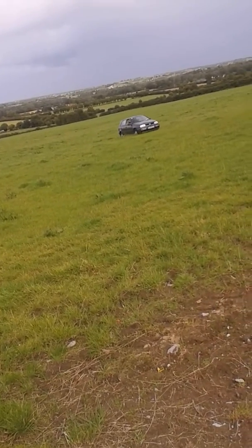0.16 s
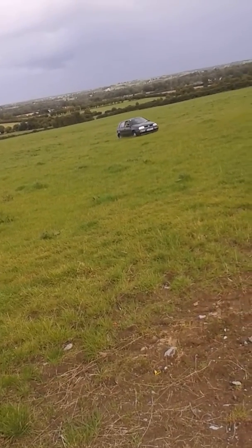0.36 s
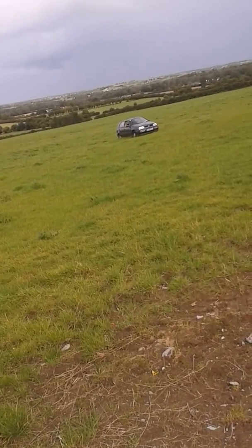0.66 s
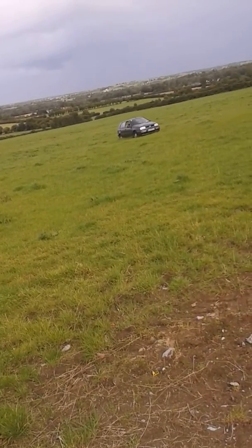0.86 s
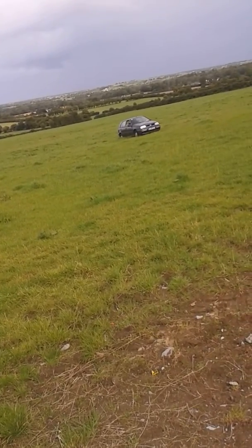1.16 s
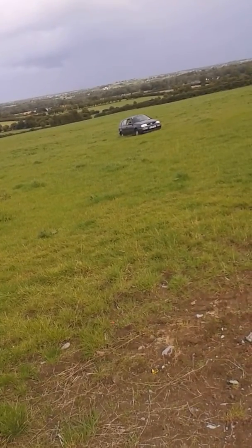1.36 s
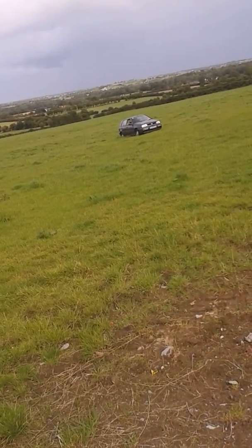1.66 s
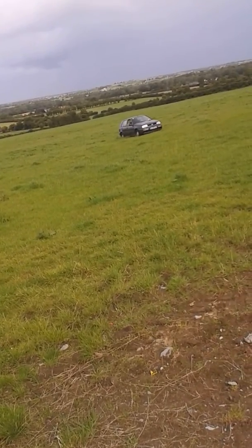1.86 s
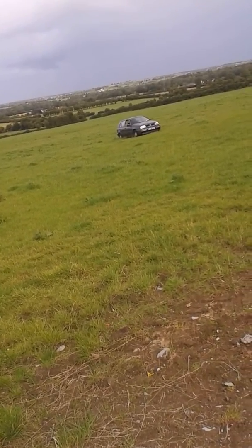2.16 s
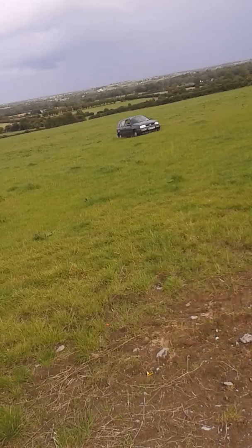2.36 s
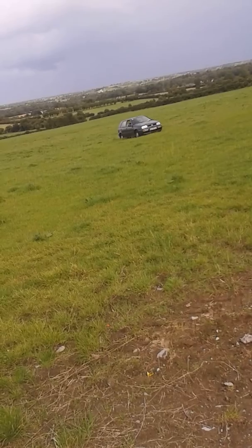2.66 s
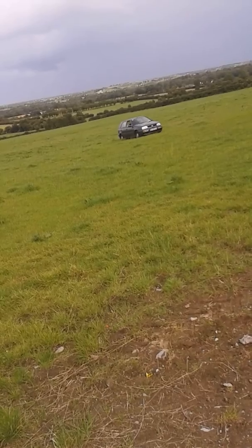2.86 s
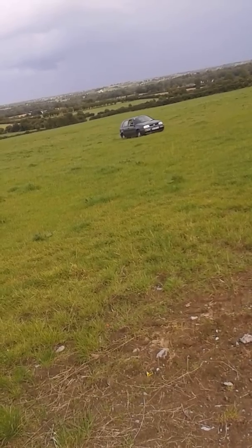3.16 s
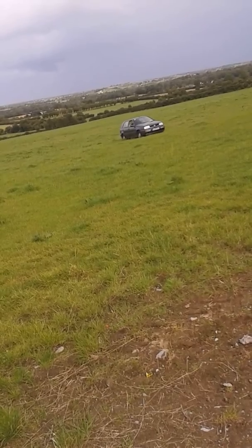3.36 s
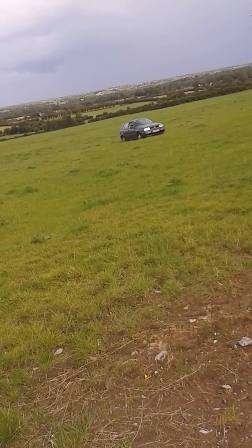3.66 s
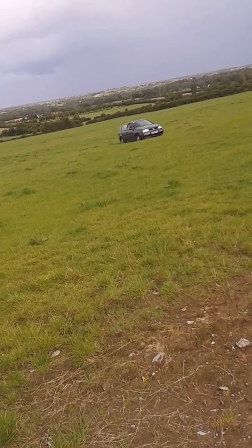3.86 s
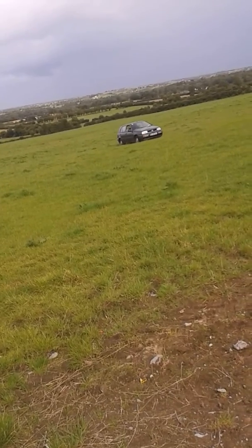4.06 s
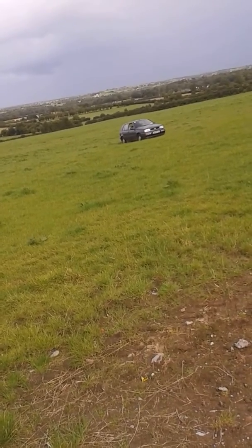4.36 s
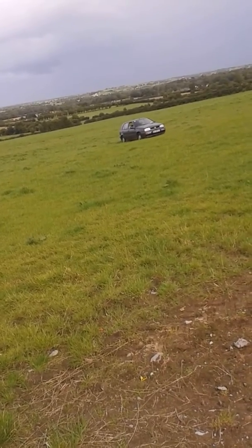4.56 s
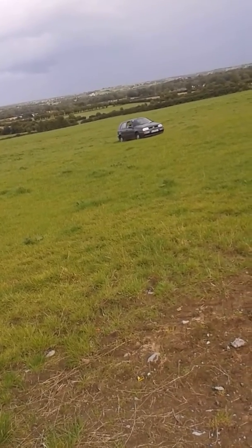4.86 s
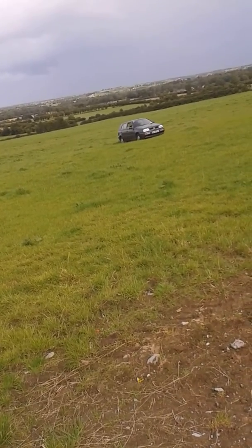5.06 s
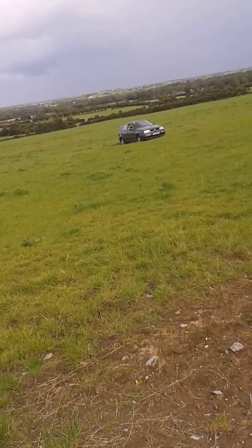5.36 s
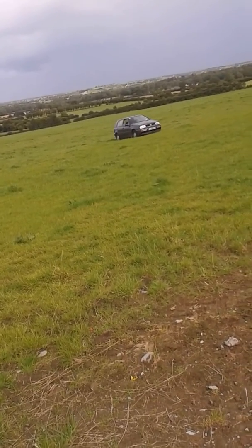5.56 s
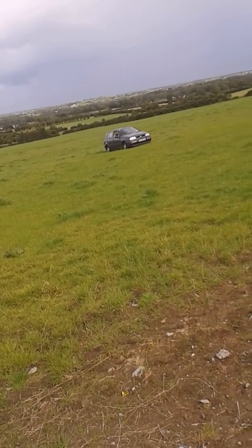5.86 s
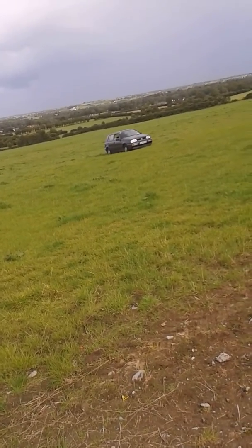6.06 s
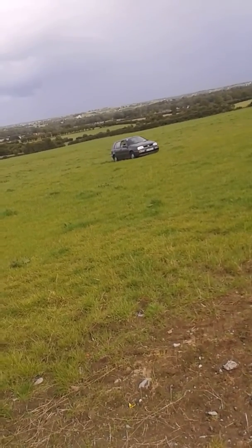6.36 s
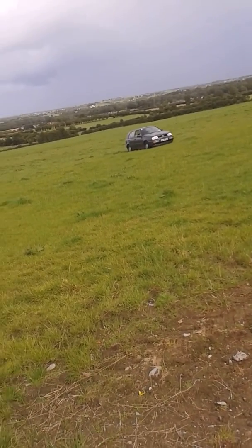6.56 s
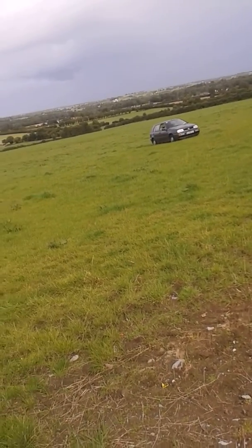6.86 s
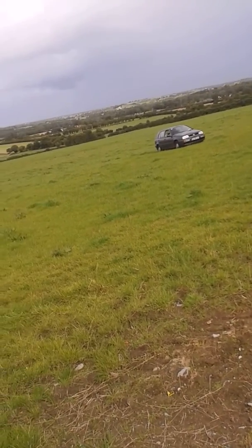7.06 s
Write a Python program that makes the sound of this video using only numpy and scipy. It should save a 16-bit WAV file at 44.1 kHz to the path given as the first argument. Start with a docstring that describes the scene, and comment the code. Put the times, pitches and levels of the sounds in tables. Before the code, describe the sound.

Over faint, low field air, a small car engine chugs unevenly and gathers speed while sharp metal clanks sound through the first two seconds. Two quick revs follow, the exhaust sputtering as each falls away. The engine then holds a fairly steady drone with hiss and rattling sheet metal. A single dry tick comes before a final rev. The microphone is some distance from the car, outdoors.

```python
"""A grass field, with faint air underneath. Some way off a small four-cylinder car labours across it,
pulling away from a slow idle and blipped three times. Each firing sends a pressure pulse through the
resonances of the exhaust pipe and a puff of gas hiss through rattling sheet metal; off the throttle
the firings turn uneven. Hard clanks mark the first two seconds, and one dry tick comes later."""
import sys
import numpy as np
from scipy import signal
from scipy.io import wavfile
from scipy.ndimage import uniform_filter1d

SR = 44100
rng = np.random.default_rng(int(sys.argv[2]) if len(sys.argv) > 2 else 0)


def unload_audio(sound):
    """Save the sound as a 16-bit wav file, at the path given as the first command line argument."""
    columns = np.transpose(np.atleast_2d(sound))
    # keep every value between -1 and 1, then stretch to whole-number steps
    steps = np.round(np.clip(columns, -1, 1) * 32767)
    wavfile.write(sys.argv[1], SR, steps.astype(np.int16))


N = 318402

# Field air. Each row: frequency in Hz, relative spectral density in dB.
AIR_SPECTRUM = [(30, -22), (60, 3.5), (200, 1.5), (800, -13), (3500, -26.5), (15600, -37)]
# Engine speed. Each row: time in seconds, firings per second.
FIRING_RATE = [(0.0, 17.0), (0.417, 14.9), (0.704, 36.1), (0.919, 37.4), (1.19, 31.4), (1.4, 32.8),
               (1.809, 46.3), (2.147, 73.3), (2.325, 72.6), (2.6, 87.8), (2.79, 104.0), (2.93, 90.5),
               (3.118, 68.7), (3.506, 103.3), (3.825, 68.0), (4.212, 64.7), (4.525, 70.6), (4.856, 66.7),
               (5.539, 73.0), (5.9, 67.0), (6.229, 82.3), (6.731, 80.0), (6.997, 98.0), (7.22, 93.2)]
# Throttle opening. Each row: time in seconds, gas hiss level in dB before surges.
THROTTLE = [(0.0, -50), (0.34, -53.5), (0.67, -42.5), (1.08, -44.5), (1.27, -38.5), (1.76, -40),
            (2.09, -34), (2.3, -42), (2.47, -38.5), (2.62, -42), (2.78, -40), (2.88, -48.5), (3.13, -46.5),
            (3.22, -35.5), (3.52, -37.0), (3.57, -48), (4.21, -44), (4.43, -38.5), (4.71, -46.5),
            (5.03, -41), (5.54, -42.5), (5.6, -47), (5.88, -45.5), (6.0, -36), (6.12, -36), (6.28, -43),
            (6.65, -43.5), (6.75, -33.5), (6.97, -36.5), (7.22, -44)]
# Open throttle meets the main pipe resonance. Each entry: peak time in seconds.
SURGE_TIMES = [2.71, 3.42, 6.93]
# The throttle shuts. Each row: start and end in seconds, unevenness from 0 to 1.
LIFTS = [(2.28, 2.33, .7), (2.81, 3.11, .88), (3.54, 3.88, .85)]
# Rough running. Each row: firings per second, unevenness from 0 to 1.
UNEVEN_BY_SPEED = [(15, .38), (33, .26), (37, .13), (62, .03)]
# The tailpipe side swings into view. Each row: time in seconds, turn from 0 to 1.
TURN = [(0, 0.67), (1.5, 0.25), (2.5, 0.01), (3.5, 0.02), (4, 0), (5, 0.08), (5.7, 0.77), (6.0, 0.98),
        (6.5, 0.99), (6.9, 0.99), (7.22, 0.75)]
# The four cylinders. Each row: strength in dB, delay in milliseconds.
CYLINDERS = [(-0.5, 0.036), (-0.5, 0.15), (0.45, 0.087), (-1, 0.14)]
# Pipe turbulence clears as the gas flows faster. Each row: firings per second, relative level in dB.
SWIRL_BY_SPEED = [(67, 3), (85, -5)]
# Exhaust modes in four groups. Each row: frequency in Hz, bandwidth in Hz, relative gain in dB.
BOOM_MODES = [(70, 5.6, 10.5), (90.7, 19, 7), (130, 75, -2.5)]
NOTE_MODES = [(183.4, 10.7, -0.055), (214.1, 8.4, -0.89), (241.1, 6.6, -0.75)]
BARK_MODES = [(290.4, 29.8, 2), (332.3, 34.4, -0.5), (369, 27, 0.5), (434, 26.5, -4), (466.5, 22, -7.5)]
GROWL_MODES = [(559, 43, 1.5), (697, 55, 4)]
# Exhaust loudness. Each row: firings per second, then base levels of note, boom and bark in dB.
PIPE_LEVELS = [(15.2, -57.5, -51, -74), (31.2, -38, -37.5, -52.5), (36.3, -36.5, -38.5, -46.5),
               (47, -34, -35.0, -47.5), (55.0, -40, -42, -40.5), (61.5, -33, -33.5, -45.0),
               (67.7, -36, -36.0, -49), (70.65, -28.0, -37.0, -44.5), (76.2, -28, -40.5, -37.5),
               (80.8, -25.5, -41.5, -43), (85.4, -28.0, -34.0, -38.5), (97.5, -24.5, -33.5, -33.5),
               (102, -25.5, -33.5, -32.5)]
# Response of note, boom and bark. Each row: dB per dB of throttle, dB per unit of surge.
PIPE_RESPONSE = [(.12, 11), (0.48, 10.5), (0.31, 4.5)]
# Escaping gas. Each row: frequency in Hz, relative spectral density in dB.
HISS_SPECTRUM = [(300, -30), (500, -20), (800, -4), (1500, -9), (2500, -1), (4000, -3.5), (6200, -21.5),
                 (7000, -15), (12000, -20.5), (15600, -29)]
# Sheet metal and tailpipe. Each row: frequency in Hz, nominal bandwidth in Hz, relative gain in dB,
# nominal dB gained per dB of hiss, dB gained at full turn.
METAL_MODES = [(1079, 213, -2.5, -1.5, -10), (1248, 180, -10.5, 0.5, 0), (1899, 320, -2, -4.8, -3.5),
               (2530, 260, 1.5, 0.26, 4.5), (2762, 190, 2.5, 9.5, -9), (3532, 150, -3.5, -0.5, 1.5),
               (3970, 660, -2.5, 1, 0), (5086, 290, -3, 0.5, 0.5), (6030, 520, -3, 0, -2.5),
               (6940, 550, -13.5, 0, 0.5), (8150, 510, -17.5, 1, 3.5), (8980, 560, -19, 0.5, 5.5),
               (10350, 770, -19, 0.5, 3), (11440, 580, -22, 0, 1), (12700, 800, -27.5, 1, -1)]
# Hard firings under load. Each row: start in seconds, relative peak in dB, ring frequency in Hz.
CLANKS = [(0.109, -33, 2880), (0.488, -31, 3550), (0.5334, -30, 3480), (0.611, -28, 2900),
          (0.646, -37, 2000), (0.6714, -30, 3640), (0.761, -27, 2720), (0.787, -24, 3700),
          (0.8944, -28, 3670), (1.0347, -27, 2080), (1.09, -26, 3840), (1.1162, -24, 2420),
          (1.1525, -26, 4200), (1.2164, -24, 5940), (1.241, -20.5, 2640), (1.3393, -29, 3400),
          (1.4324, -25, 4500), (1.4583, -26, 2650), (1.485, -27, 2700), (1.5464, -30, 2730),
          (1.6216, -22.5, 4900), (1.644, -21.5, 4960), (1.762, -39, 1880), (1.8046, -22, 6000),
          (1.8262, -29, 3620), (1.8666, -23, 3750)]
# A dry tick. Each row: start in seconds, relative level in dB.
TICKS = [(5.5192, -22)]

AIR_DB, MEAN_THROTTLE_DB, HISS_SURGE_DB = -51.5, -42, 7.5
FLYWHEEL_S, LIFT_EDGE_S, JITTER_MS = .1, .05, .04
SURGE_RISE_S, SURGE_TOP_S, SURGE_FALL_S = .035, .03, .085
PUFF_RISE_S, PUFF_FALL_S = .0018, .015
CUTOFF_HZ = 15550


def from_db(db):
    """Amplitude grows tenfold for every 20 dB."""
    return 10 ** (np.asarray(db) / 20)


def unit_rms(x):
    """Normalisation to unit mean power."""
    return x / np.sqrt(np.mean(x ** 2) + 1e-20)


def slow_rms(x):
    """Power averaged over about a tenth of a second gives the running amplitude."""
    return np.sqrt(uniform_filter1d(uniform_filter1d(x ** 2, size=3000), size=3000) + 1e-20)


def in_time(rows):
    """Linear interpolation of a time curve at every sample."""
    return np.interp(np.arange(N) / SR, *np.transpose(rows))


def wander(step_s):
    """Slow drift by linear interpolation between random values."""
    knots = np.arange(0, N / SR + step_s, step_s)
    return np.interp(np.arange(N) / SR, knots, rng.standard_normal(len(knots)))


def impulses(at, strengths):
    """An impulse train, nonzero only at the given samples."""
    train = np.zeros(N)
    train[at] = strengths
    return train


def lag(x, seconds):
    """First-order relaxation with the given time constant."""
    r = np.exp(-1 / (seconds * SR))
    return signal.lfilter([1 - r], [1, -r], x + 1e-18)


def resonance(x, hz, width_hz):
    """A damped oscillator with unit gain at its peak."""
    r = np.exp(-np.pi * width_hz / SR)
    feedback = [1, -2 * r * np.cos(2 * np.pi * hz / SR), r * r]
    return signal.lfilter(np.array([1, 0, -1]) * (1 - r * r) / 2, feedback, x + 1e-18)


def bandpass(x, order, low_hz, high_hz):
    """A maximally flat filter passes the band between two edges."""
    return signal.sosfilt(signal.butter(order, [low_hz, high_hz], "band", fs=SR, output="sos"), x)


def noise_bands(spectrum):
    """White noise filtered into half octaves, each weighted by the spectrum."""
    hz, level_db = np.transpose(spectrum)
    edges = 28 * 2 ** np.arange(0, 9.6, .5)
    white = rng.standard_normal((2, N))
    gains = from_db(np.interp(np.log(edges[:-1] * edges[1:]) / 2, np.log(hz), level_db))
    return [gain * bandpass(white[k % 2], 2, edges[k], edges[k + 1]) for k, gain in enumerate(gains)]


def field_air():
    """Stationary noise with its power concentrated at low frequencies."""
    return from_db(AIR_DB) * unit_rms(sum(noise_bands(AIR_SPECTRUM)))


def crank():
    """Flywheel inertia smooths the firing rate; each whole cycle of its integral is one firing."""
    rate = uniform_filter1d(in_time(FIRING_RATE), size=round(FLYWHEEL_S * SR), mode="nearest")
    cycles = np.cumsum(rate) / SR + .13
    return rate, np.flatnonzero(np.diff(np.floor(cycles), prepend=-1) > 0)


def surges():
    """A resonant swell grows exponentially, rounds off and decays more slowly."""
    since = np.arange(N) / SR - np.array(SURGE_TIMES)[:, None]
    swell = np.exp(np.minimum(since / SURGE_RISE_S, -since / SURGE_FALL_S)).sum(axis=0)
    return uniform_filter1d(swell, size=round(SURGE_TOP_S * SR))


def firing_pulses(rate, firings):
    """Combustion varies from cycle to cycle, most at low speed and with the throttle shut."""
    t = firings / SR
    uneven = np.interp(rate[firings], *np.transpose(UNEVEN_BY_SPEED))
    for start, end, share in LIFTS:
        shut = np.clip(np.minimum(t - start, end - t) / LIFT_EDGE_S + .5, 0, 1)
        uneven = np.maximum(uneven, share * shut)
    scatter, jitter = rng.uniform(-np.sqrt(3), np.sqrt(3), (len(firings), 2)).T
    strength_db, late_ms = np.resize(CYLINDERS, (len(firings), 2)).T
    strengths = from_db(strength_db) * (np.sqrt(1 - uneven ** 2) + uneven * scatter)
    delays = np.round((late_ms + JITTER_MS * jitter) * SR / 1000).astype(int)
    return impulses(np.clip(firings + delays, 0, N - 1), strengths)


def exhaust(rate, firings, throttle_db, swell, turn):
    """Pulses and turbulence force the pipe modes, loudest at speeds where a harmonic meets a mode."""
    pulses = firing_pulses(rate, firings)
    swirl_db = np.interp(rate, *np.transpose(SWIRL_BY_SPEED))
    swirl = from_db(swirl_db) * rng.standard_normal(N) * slow_rms(impulses(firings, 1))
    rates, *base_levels = np.transpose(PIPE_LEVELS)
    note_db, boom_db, bark_db = [
        np.interp(rate, rates, base_db) + follow * (throttle_db - MEAN_THROTTLE_DB) + surge_db * swell
        for base_db, (follow, surge_db) in zip(base_levels, PIPE_RESPONSE)]
    out = 0
    for modes, band_hz, level_db, blur in [(BOOM_MODES, (54, 160), boom_db, .02),
                                           (NOTE_MODES, (150, 270), note_db, .03),
                                           (BARK_MODES, (260, 490), bark_db, .55),
                                           (GROWL_MODES, (500, 800), bark_db - 26 + 16 * turn, .5)]:
        drive = pulses + blur * swirl
        ringing = sum((-1) ** k * from_db(db) * resonance(drive, hz, width)
                      for k, (hz, width, db) in enumerate(modes))
        ringing = bandpass(ringing, 3, *band_hz)
        out += from_db(level_db) * ringing / slow_rms(ringing)
    return out


def gas_puffs(firings, strengths):
    """Each firing releases a flow that rises quickly and relaxes exponentially."""
    return lag(lag(impulses(firings, strengths), PUFF_FALL_S), PUFF_RISE_S)


def metal_rattle(puffs, hiss_db, turn):
    """Contact noise in millisecond grains excites the damped modes of thin metal at each puff."""
    grit = rng.standard_normal(N) * from_db(2.12 * rng.standard_normal(N // 40 + 1)).repeat(40)[:N]
    out = 0
    for (hz, width, db, by_hiss, by_turn), puff in zip(METAL_MODES, puffs):
        sway_db = 1.5 * wander(step_s=.3)  # the panels shift as the car rocks
        drive_db = np.clip(by_hiss, -.4, .5) * (hiss_db + 40)
        width = max(width, hz / 30 + 80)  # damped metal never rings long
        ringing = resonance(resonance(grit * puff, hz, width), hz, width)
        out += from_db(db + 3.5 + drive_db + by_turn * turn + sway_db) * ringing
    return out


def hiss_and_rattle(firings, hiss_db, turn):
    """Gas puffs modulate the amplitude of each noise band and metal mode, by a new amount each firing."""
    bands = noise_bands(HISS_SPECTRUM)[8:]  # from 448 Hz up
    *own_draws, shared_draw = rng.standard_normal((len(firings), len(bands) + len(METAL_MODES) + 1)).T
    mean_flow = slow_rms(gas_puffs(firings, .6))
    steady_leak = .12
    puffs = [gas_puffs(firings, from_db(1.75 * shared_draw + 3.32 * own)) / mean_flow + steady_leak
             for own in own_draws]
    hiss = sum(band * puff for band, puff in zip(bands, puffs))
    rattle = metal_rattle(puffs[len(bands):], hiss_db, turn)
    return from_db(hiss_db) * unit_rms(hiss + rattle)


def clanks():
    """Shock excitation: a hard firing is a short noise burst that rings one resonance."""
    out, size = np.zeros(N), 2000
    t = np.arange(size) / SR
    for start_s, db, hz in CLANKS:
        burst = rng.standard_normal(size) * (1 - np.exp(-t / .00045)) * np.exp(-t / .0088)
        ringing = resonance(resonance(burst, hz, width_hz=420), hz, width_hz=420)
        start = round(start_s * SR)
        out[start:start + size] += from_db(db - 7) * ringing / np.abs(ringing).max()
    return out


def dry_tick():
    """A millisecond of bright noise, too heavily damped to have a pitch."""
    strikes = impulses([round(s * SR) for s, _ in TICKS], from_db([db for _, db in TICKS]))
    burst = lag(strikes, seconds=.00053) * .00062 * SR * rng.standard_normal(N)
    return from_db(7.5) * resonance(resonance(burst, 5600, 5400), 5400, 5300)


def scene():
    """Air, car and tick superpose; exhaust and hiss share the same firings and throttle."""
    air = field_air()
    rate, firings = crank()
    throttle_db, swell, turn = in_time(THROTTLE), surges(), in_time(TURN)
    pipe = exhaust(rate, firings, throttle_db, swell, turn)
    gas_and_metal = hiss_and_rattle(firings, throttle_db + HISS_SURGE_DB * swell, turn)
    return (air + pipe + gas_and_metal + clanks() + dry_tick())[None]


def record(dry):
    """A steep low-pass filter removes the highest treble."""
    return signal.sosfilt(signal.ellip(10, .5, 70, CUTOFF_HZ, fs=SR, output="sos"), dry)


dry = scene()
out = record(dry)
unload_audio(out)
```